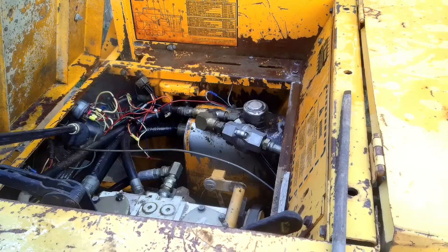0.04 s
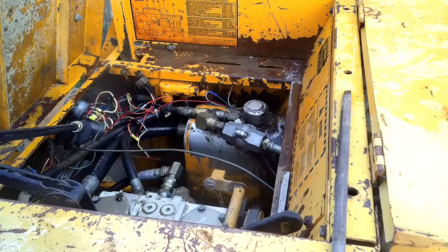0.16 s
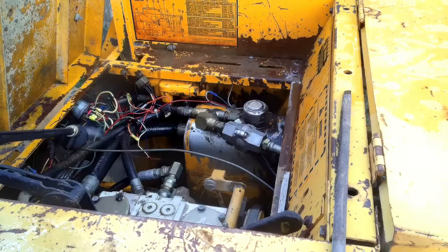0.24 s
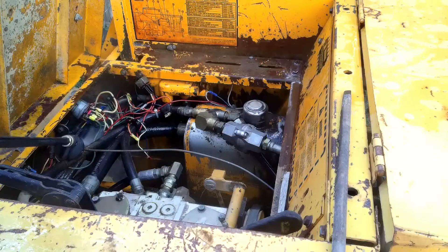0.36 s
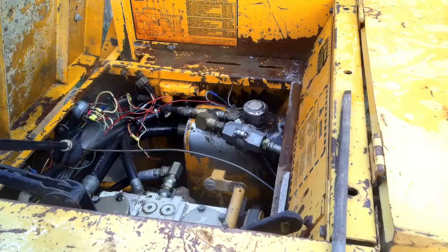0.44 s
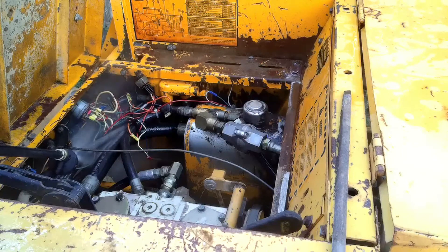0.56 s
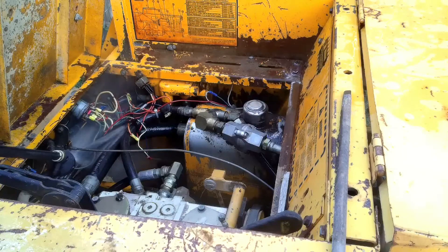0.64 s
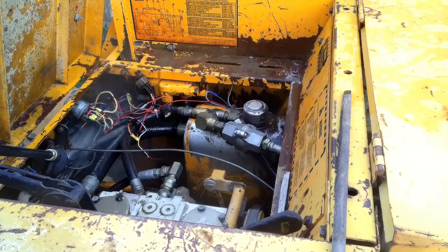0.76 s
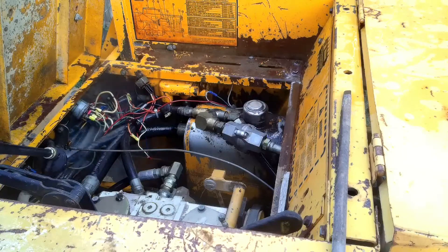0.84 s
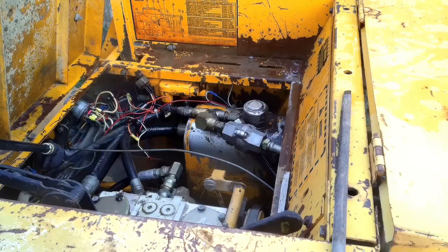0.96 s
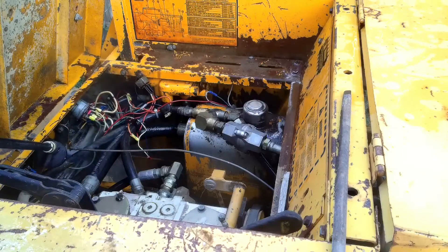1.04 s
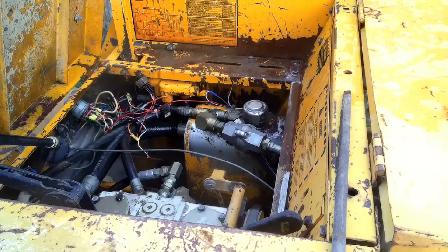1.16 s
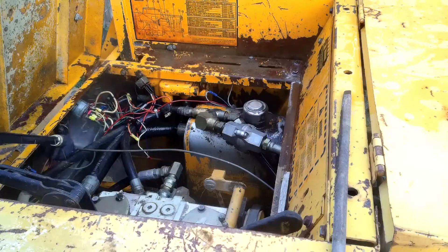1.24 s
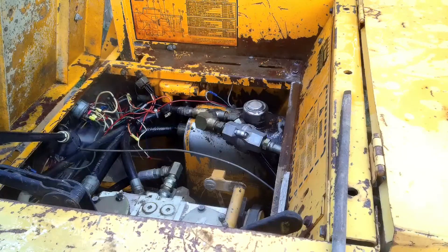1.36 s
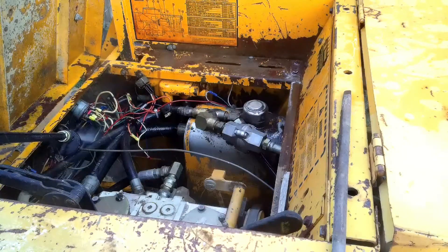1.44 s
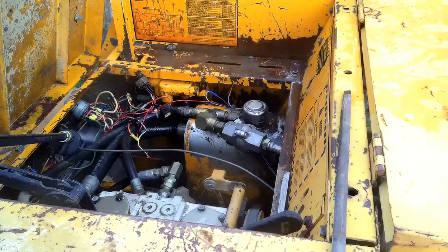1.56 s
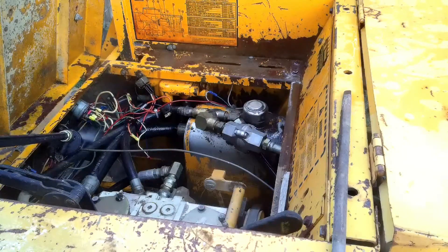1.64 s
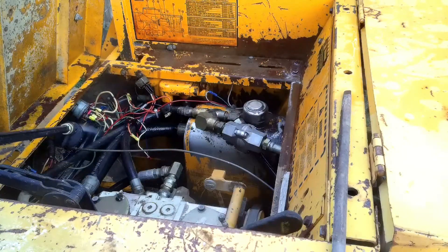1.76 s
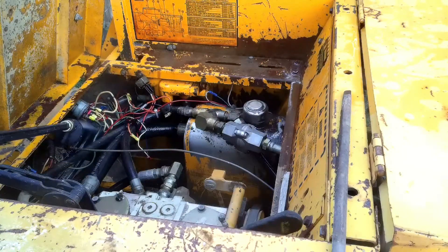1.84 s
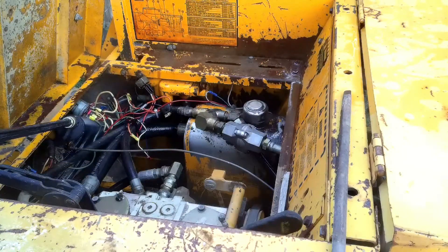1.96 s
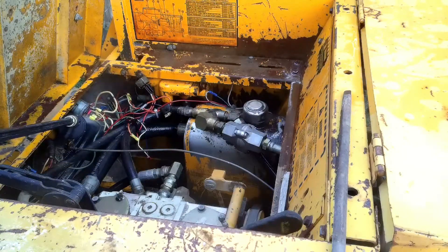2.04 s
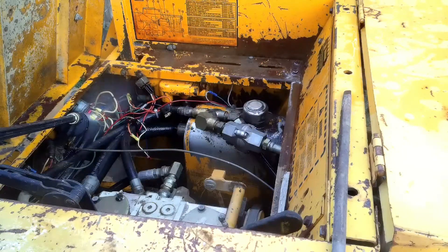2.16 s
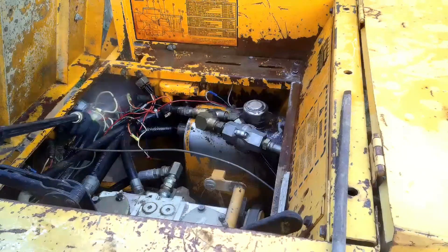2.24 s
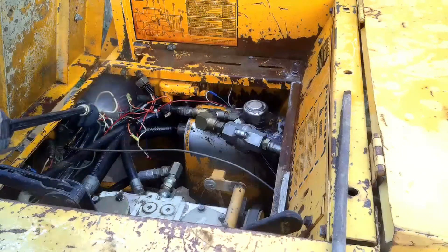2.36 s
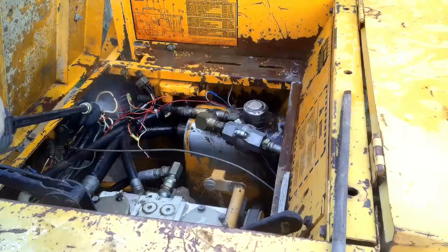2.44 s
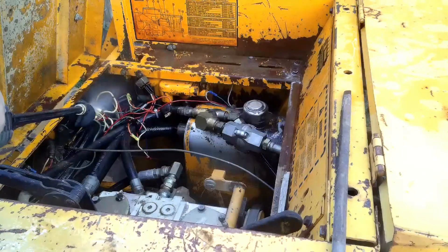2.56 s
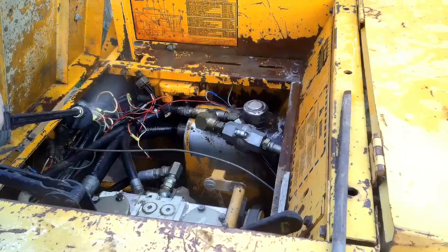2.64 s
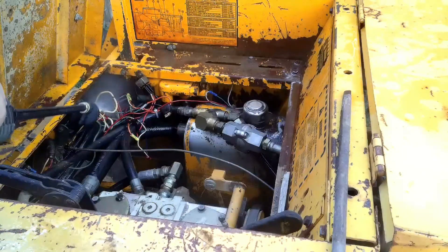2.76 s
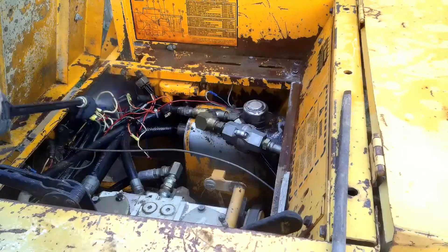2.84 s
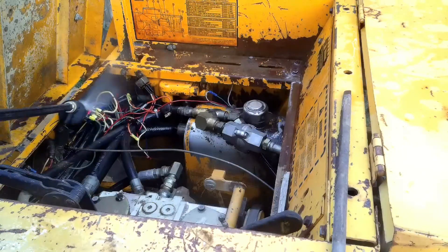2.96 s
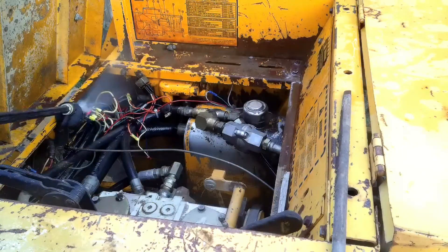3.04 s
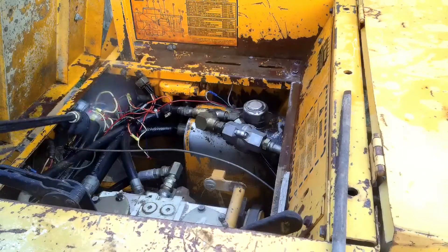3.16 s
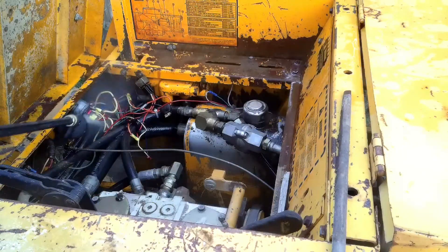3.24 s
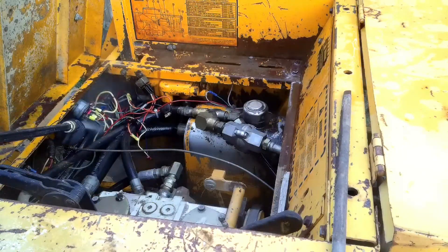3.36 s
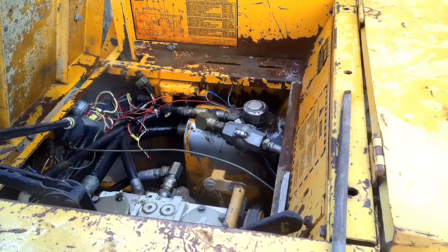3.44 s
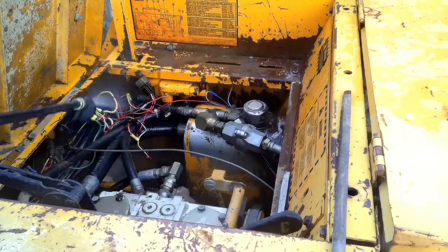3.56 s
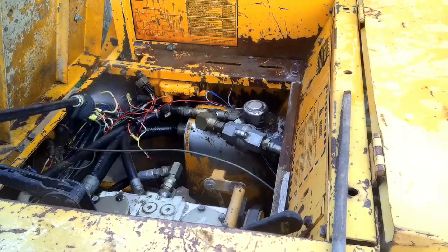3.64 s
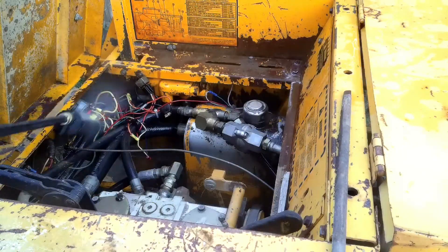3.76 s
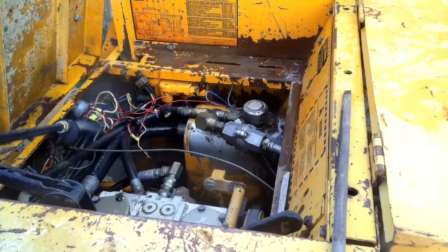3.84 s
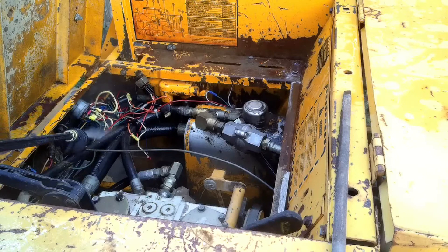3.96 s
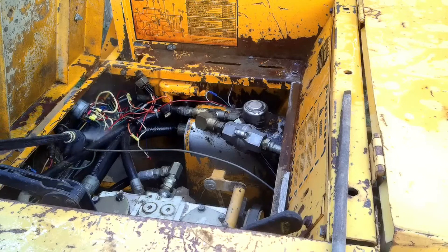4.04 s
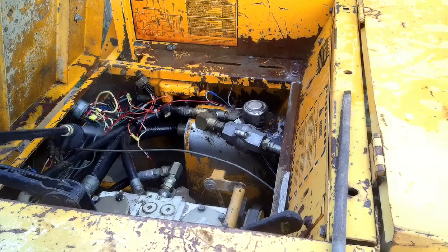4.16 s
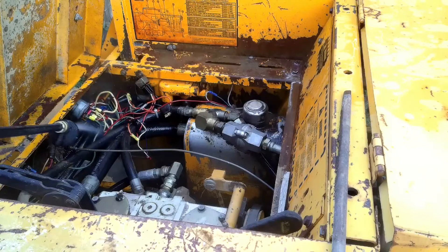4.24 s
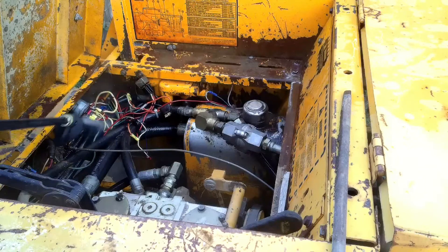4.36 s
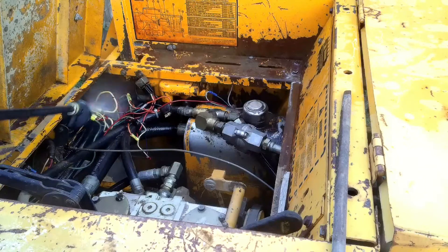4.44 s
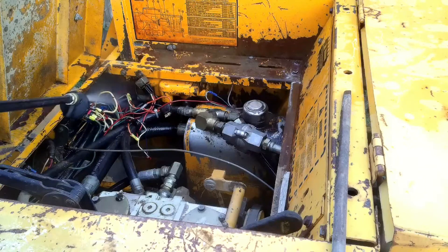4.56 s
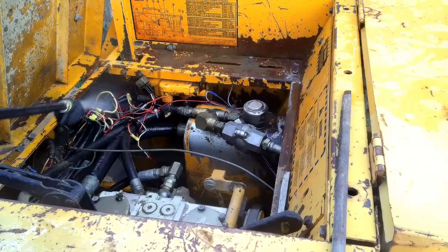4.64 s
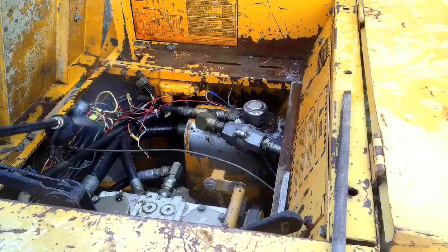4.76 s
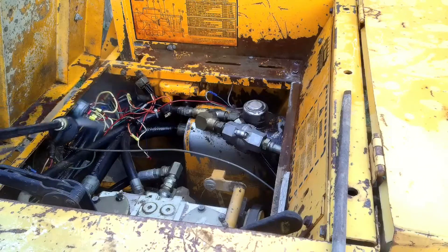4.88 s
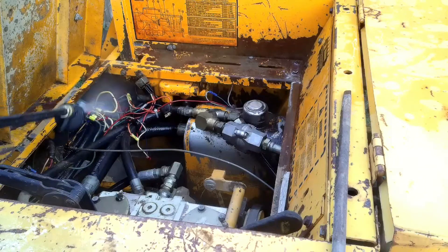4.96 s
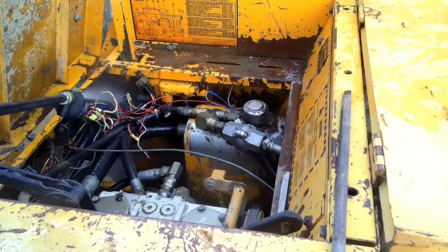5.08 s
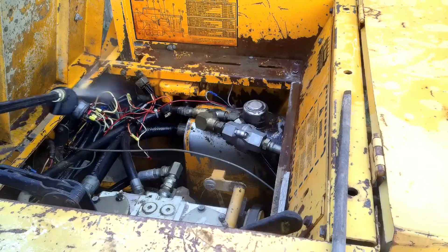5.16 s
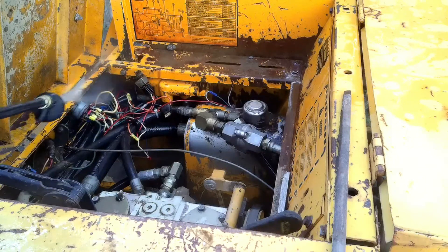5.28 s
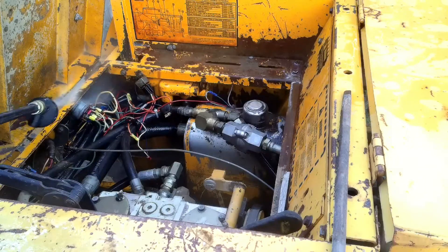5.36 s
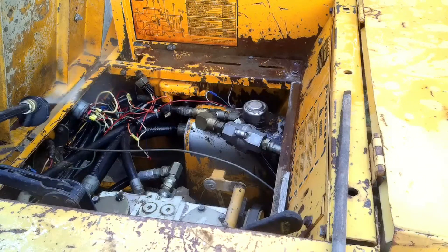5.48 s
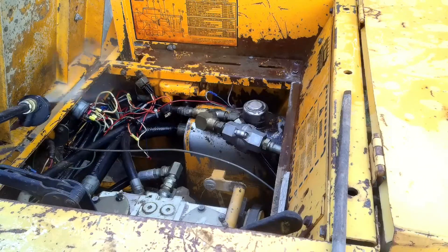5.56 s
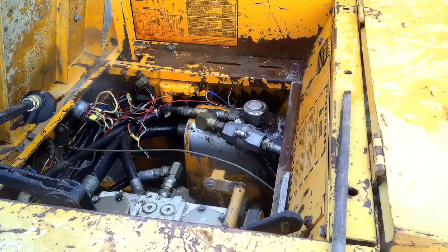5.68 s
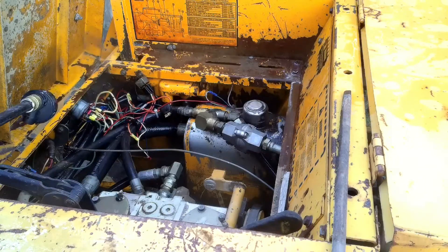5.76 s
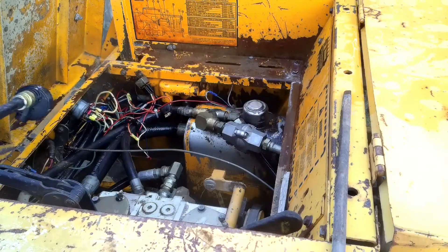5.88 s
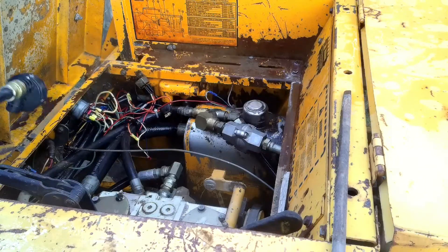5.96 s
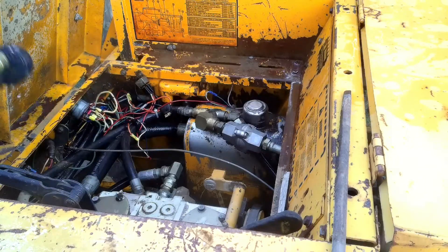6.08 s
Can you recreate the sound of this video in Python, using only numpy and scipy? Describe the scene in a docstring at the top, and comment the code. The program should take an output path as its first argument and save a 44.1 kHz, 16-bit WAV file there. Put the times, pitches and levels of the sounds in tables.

```python
"""A hand-pumped pressure sprayer mists the open engine bay of a machine, outdoors, close to a mono microphone.
Coloured noise and random impacts make its hiss, drumming drops and sheet-metal patter, echoed by the bay.
Sine tones whistle thinly at the nozzle, and a pulse repeated evenly through resonances makes the wand buzz.
When the trigger is let go the pressure dies in a falling, resonant squirt, and the valve shuts with light
clicks of noise; the last drops land over faint yard air."""
import sys
import numpy as np
from scipy import signal
from scipy.fft import rfft, irfft, next_fast_len
from scipy.io import wavfile

SR = 44100
rng = np.random.default_rng(int(sys.argv[2]) if len(sys.argv) > 2 else 0)


def store_wav(level_fs):
    """Save 16-bit WAV to argv[1]."""
    pcm = np.round(np.clip(np.atleast_2d(level_fs), -1, 1) * 32767)
    wavfile.write(sys.argv[1], SR, pcm.T.astype(np.int16))


N = 269615
TIME = np.arange(N) / SR  # seconds
BINS = np.fft.rfftfreq(2 * next_fast_len(N // 2 + 1, True), 1 / SR)  # Hz

# the trigger is let go and the flow collapses; then the valve seats
RELEASE_S, COLLAPSE_S = 5.609, 0.057
SEAT_S, SEATING_S, SEAT_DB = 5.797, 0.04, -21
FLUTTER_HZ = 39.385  # the even pulsing of the flow
SPUTTER_DB = 2  # typical swing of the spits after release


def undb(db):
    """Decibels to gain."""
    return 10 ** (np.asarray(db) / 20)


def curves(rows):
    """Each column of a table, joined by straight lines in time."""
    s, *columns = np.transpose(rows)
    return [np.interp(TIME, s, column) for column in columns]


def colour(points):
    """Gain at every frequency from (Hz, dB) points."""
    hz, db = np.transpose(points)
    return undb(np.interp(np.log(BINS + 1), np.log(hz), db))


def shape(x, gain):
    """Filter by a gain at every frequency."""
    spectrum = rfft(x, 2 * len(BINS) - 2)
    return irfft(spectrum * gain)[:N]


def unit(x, lo=0, hi=SR / 2):
    """Scale to rms 1 within a band in Hz."""
    return x / np.std(shape(x, (BINS >= lo) & (BINS <= hi)))


def walk(rate):
    """Smooth chance with spread 1, changing about rate times a second."""
    return unit(shape(rng.standard_normal(N), 1 / (1 + (BINS / rate) ** 4)))


def since(s):
    """Seconds gone by after a moment, 0 before it."""
    return np.maximum(TIME - s, 0)


def ramp(s, length_s):
    """Rises from 0 to 1, starting at a moment."""
    return np.minimum(since(s) / length_s, 1)


def hump(s, half_length_s):
    """Swells to 1 around a moment and dies away."""
    return np.exp(-2 * ((TIME - s) / half_length_s) ** 2)


def resonance(hz, centre, width):
    """Complex response of one resonance, 1 at its centre."""
    return 1 / (1 + 2j * (hz - centre) / width)


def droplets(per_s, scatter_db, haze):
    """Countless tiny impacts of uneven size in a haze of air noise."""
    landed = rng.random(N) < per_s / SR
    size = undb(scatter_db * np.minimum(rng.exponential(size=N), 5))
    hits = landed * rng.standard_normal(N) * size
    return unit(hits) + haze * rng.standard_normal(N)


# Open air around the machine. Each row: frequency in Hz, relative level in dB per Hz.
YARD_COLOUR = [(30, -14.5), (60, -7), (85, 0.5), (130, -7.5), (200, -16.5), (500, -16), (1200, -25),
               (3300, -31), (6000, -29.5), (15000, -36)]
YARD_DB = -85


def yard():
    """Faint outdoor air: coloured noise whose level wavers gently."""
    air = unit(shape(rng.standard_normal(N), colour(YARD_COLOUR)))
    return air * undb(YARD_DB + 0.74 * walk(7.2))


def bay(x, wet_db, t60_s):
    """The steel walls of the bay throw back a short, dense echo: noise that decays exponentially."""
    echo = rng.standard_normal(N) * undb(-60 * TIME / t60_s) * (TIME > 0.002)
    echo = echo / np.linalg.norm(echo)
    return x + undb(wet_db) * signal.fftconvolve(x, echo)[:N]


# Thin side panel under the drops. Each row: frequency in Hz, relative level in dB per Hz.
PANEL_COLOUR = [(40, -37), (110, -15.5), (160, -17.5), (230, -3.5), (330, -8.5), (560, -0.5), (900, -19),
                (3000, -50)]
# the fan of spray swings onto the panel and patters ever harder until the flow collapses
PANEL_S, PANEL_ATTACK_S, PANEL_DB, PANEL_RISE_DB_PER_S = 4.87, 0.1, -67, 10.5


def panel():
    """Drops on thin sheet metal make a soft low patter."""
    level = undb(PANEL_DB + PANEL_RISE_DB_PER_S * since(PANEL_S))
    envelope = ramp(PANEL_S, PANEL_ATTACK_S) * level * (1 - ramp(RELEASE_S, COLLAPSE_S))
    return unit(shape(droplets(620, 1.2, 0.96), colour(PANEL_COLOUR))) * envelope


# Drops landing after the valve has shut. Each row: frequency in Hz, relative level in dB per Hz.
LAST_DROPS_COLOUR = [(200, -6), (550, 8), (900, 1), (1650, 0), (2300, -4), (3800, -3), (6000, -9),
                     (15000, -21)]
LAST_DROPS_DB, LAST_DROPS_FALL_DB_PER_S = -77, -57


def last_drops():
    """Mist still in the air settles on the metal as fading, coloured impacts."""
    level = undb(LAST_DROPS_DB + LAST_DROPS_FALL_DB_PER_S * since(SEAT_S))
    envelope = ramp(SEAT_S, SEATING_S / 2) * level
    return unit(shape(droplets(2500, 1.4, 1.1), colour(LAST_DROPS_COLOUR))) * envelope


# The valve shutting. Each row: start in seconds, level in dB before the decay, ring (decay time) in seconds,
# treble tilt in dB (approached far above 5 kHz, then scaled out of the overall level).
VALVE_CLICKS = [(5.8129, -54, 0.0026, -6), (5.819, -63, 0.0079, 12), (5.8285, -62, .0015, -15)]
# Shared colour of the clicks. Each row: frequency in Hz, relative level in dB per Hz.
CLICK_COLOUR = [(300, -9), (1000, -23), (1700, 3), (3200, -9), (6000, -15), (10000, -25), (15000, -37)]


def valve():
    """Short plastic ticks as the valve seats: noise that starts at once and decays exponentially."""
    out = 0
    for s, db, ring_s, treble_db in VALVE_CLICKS:
        tilt = undb(treble_db * BINS / (BINS + 5000))
        tick = unit(shape(rng.standard_normal(N), colour(CLICK_COLOUR) * tilt))
        out = out + tick * undb(db) * (TIME >= s) * np.exp(-np.abs(TIME - s) / ring_s)
    return out


# Squeaks as the trigger eases. Each row: middle in seconds, pitch there in Hz, half-length in seconds,
# peak level in dB.
CHIRPS = [(5.547, 2170, .024, -52), (5.571, 2900, .012, -50), (5.585, 1300, .04, -54),
          (5.607, 4400, .012, -49)]
CHIRP_GLIDE_S = 0.25  # time in which the pitch falls by a factor e


def chirps():
    """The nozzle squeaks briefly, each squeak a sine sliding down."""
    out, waver = 0, 1 + 0.01 * walk(200)
    for s, hz, half_length_s, db in CHIRPS:
        glide = np.exp(-np.clip((TIME - s) / CHIRP_GLIDE_S, -1, 1))
        turn = 2 * np.pi * np.cumsum(hz * glide * waver) / SR
        out = out + np.sqrt(2) * np.sin(turn) * undb(db) * hump(s, half_length_s)
    return out


# The jet grazing a nearby edge. Each row: middle in seconds, half-length in seconds, peak level in dB.
SIZZLES = [(.47, .07, -53), (1.11, 0.07, -53), (2.13, 0.18, -55), (2.6, .4, -59), (3.16, 0.23, -59)]
# Colour of the grazing jet. Each row: frequency in Hz, relative level in dB per Hz.
SIZZLE_COLOUR = [(2000, -22), (6000, -6), (8000, -3), (10800, 2.5), (12500, -6), (15500, -11)]


def sizzles():
    """Bright, grainy flares of tiny impacts where the jet grazes an edge."""
    envelope = sum(undb(db) * hump(s, half_length_s) for s, half_length_s, db in SIZZLES)
    return unit(shape(droplets(5000, 1.5, 0.6), colour(SIZZLE_COLOUR))) * envelope


# Partials of the squirt's note. Each row: multiple of the pitch, level in dB before it flickers.
SQUIRT_PARTIALS = [(1, -4), (2, -2), (3, -7.5), (4, -7), (5, -13), (6, -15)]
# Resonances of the wand that the squirt slides through. Each row: centre in Hz, width in Hz, peak gain in dB.
SQUIRT_BODY = [(600, 170, 0.5), (1130, 170, -3), (1560, 90, 2.5), (1830, 150, 4.5), (2470, 110, 5),
               (2870, 100, 12), (3470, 160, 3), (4050, 160, 0)]
# the last squirt swells quickly, then pitch and level run down with the pressure
SQUIRT_S, SQUIRT_HZ, SQUIRT_DB = 5.583, 2507, -41.5
SQUIRT_ATTACK_S, SQUIRT_GLIDE_S, SQUIRT_FALL_DB_PER_S = 0.02, 0.1325, -93
SQUIRT_END_S, SQUIRT_FADE_S = 5.77, 0.017  # end of the note; its air lasts until the valve seats
SQUIRT_AIR_DB = -4  # air that escapes with the note rings the same resonances


def squirt():
    """As pressure dies, the nozzle sputters a broken, airy note that flares in each resonance it slides through."""
    start_s = SQUIRT_S - SQUIRT_ATTACK_S
    hz = SQUIRT_HZ * np.exp((SQUIRT_ATTACK_S - since(start_s)) / SQUIRT_GLIDE_S)
    level = undb(SQUIRT_DB + SQUIRT_FALL_DB_PER_S * since(SQUIRT_S))
    envelope = ramp(start_s, SQUIRT_ATTACK_S) * level
    turn = 2 * np.pi * np.cumsum(hz * (1 + 0.016 * walk(350) + 0.01 * walk(60))) / SR
    note = 0
    for multiple, db in SQUIRT_PARTIALS:
        flicker_db = 2.2 * walk(170) + 2.6 * walk(55)
        note = note + undb(db + flicker_db) * np.sin(round(multiple) * turn)
    note = note * (1 - ramp(SQUIRT_END_S, SQUIRT_FADE_S))
    air = undb(SQUIRT_AIR_DB + SPUTTER_DB * walk(60)) * rng.standard_normal(N)
    air = air * (1 - ramp(SEAT_S, SEATING_S))
    power = 0
    for centre, width, peak_db in SQUIRT_BODY:
        power = power + np.abs(undb(peak_db) * resonance(BINS, centre, width)) ** 2
    return shape((note + air) * envelope, np.sqrt(power))


# Resonances of the wand rung by the flutter. Each row: centre in Hz, width in Hz (a second pole is four times
# as wide), level in dB relative to the mist's flow level, dB gained at full lift.
WAND = [(118.5, 20, -48, 4.5), (263, 18.2, -24, 1), (425, 49, -34.5, 0.5), (550, 54, -27.5, 2.5),
        (659, 28, -22, -7), (922, 39, -8.5, -0.5), (1023, 5.1, -11.5, -4), (1280, 102, -18, 2),
        (1660, 174, -25.5, -2), (2257, 38, -14, 13), (2650, 300, -20.5, 2.5), (3432, 22, -7.5, -2),
        (3506, 18, -10.5, -3), (4465, 110, -5.5, -4), (4570, 26, -14.5, -1), (6820, 200, -22.5, 5.5),
        (8760, 260, -30, 10.5)]


def flutter(lift):
    """The flow pulses evenly; the wand's resonances pick out clusters of its harmonics, which makes a fine buzz."""
    cycle = np.cumsum(FLUTTER_HZ * (1 + 0.0002 * walk(3) + 0.0008 * walk(40))) / SR
    size = 2 ** 14  # samples in the table of one cycle
    place = (cycle % 1 * size).astype(int)
    harmonics = np.arange(size // 2 + 1) * FLUTTER_HZ
    # one noisy gush, the same in every cycle
    gush = np.exp(2j * np.pi * rng.random(len(harmonics)))
    out = 0
    for hz, width, db, lift_db in WAND:
        response = resonance(harmonics, hz, width) * resonance(harmonics, hz, 4 * width)
        ring = irfft(gush * np.abs(response)) * size / np.sqrt(2)
        out = out + ring[place] * undb(db + lift_db * lift + 0.5 * walk(3.6))
    return out


def tone(hz, waver_hz, flicker_db):
    """A flow tone of about rms 1, unsteady in pitch and strength."""
    turn = 2 * np.pi * np.cumsum(hz + waver_hz * walk(58.7)) / SR
    return np.sqrt(2) * np.sin(turn) * undb(flicker_db * walk(39))


# The main whistle swelling and fading. Each row: time in seconds, level in dB.
WHISTLE_LEVEL = [(0, -42), (.55, -46.5), (1.3, -47), (1.65, -44), (2.15, -45), (2.6, -40.5), (3, -43),
                 (3.25, -47), (3.7, -51), (4.15, -48), (4.4, -57.5), (4.8, -54), (4.95, -53.5), (5.2, -52),
                 (5.35, -59), (5.53, -51), (5.59, -45)]
# Weaker edge tones of the nozzle. Each row: pitch in Hz, level in dB relative to the mist's flow level,
# dB gained at full lift.
EDGE_TONES = [(1704, -12.5, 1), (2448, -8.5, 6), (2538, -17, 4), (3407, -11.5, 2), (4247, -9, -4),
              (5112, -14.5, -4), (7181, -23, -2), (7262, -23, -2), (8899, -24, 0)]
WHISTLE_HZ, WHISTLE_SAG_HZ_PER_S = 3654, -1  # sinks a little with the tank's pressure
BEND_S, BEND_GLIDE_S = 5.603, 0.15  # the whistles bend down as the pressure goes


def whistles(lift, mist_db):
    """Edge tones at the nozzle: one strong, the others shifting as the wand swings; all bend down at release."""
    db, = curves(WHISTLE_LEVEL)
    bend = np.exp(-since(BEND_S) / BEND_GLIDE_S)
    main_hz = (WHISTLE_HZ + WHISTLE_SAG_HZ_PER_S * TIME) * bend
    out = tone(main_hz, waver_hz=4.33, flicker_db=0.9) * undb(db)
    for edge_hz, rel_db, lift_db in EDGE_TONES:
        edge = tone(edge_hz * bend, waver_hz=5, flicker_db=1.7)
        out = out + edge * undb(mist_db + rel_db + lift_db * lift)
    return out


def flow_db(lift, db, drift_db_per_s, lift_db, collapse_db, drain_db_per_s):
    """Level of one share of the spray: drifts, follows the wand, steps and drains at release, drops at the seat."""
    steady_db = db + drift_db_per_s * TIME + lift_db * lift
    release_db = collapse_db * ramp(RELEASE_S, COLLAPSE_S) + drain_db_per_s * since(RELEASE_S)
    return steady_db + release_db + SEAT_DB * ramp(SEAT_S, SEATING_S)


# Colour of the whole spray, close to the microphone. Each row: frequency in Hz, relative level in dB per Hz.
SPRAY_COLOUR = [(30, -46), (200, -30.5), (450, -19.5), (850, -13.5), (1280, -3), (1800, -5), (2650, -1),
                (3800, -3.5), (4350, -1), (4850, -7), (6100, -5.5), (7800, -17), (8900, -12), (12500, -23),
                (15600, -29)]


def spray(drum_db, splash_db, mist_db):
    """Heavy drops drum, finer ones splash, the mist hisses; each share wavers as the fan crosses the parts."""
    hiss = colour(SPRAY_COLOUR)
    # shares of the power
    low = 1 / (1 + (BINS / 900) ** 6)
    high = 1 - 1 / (1 + (BINS / 3400) ** 6)
    drum = shape(droplets(3000, 1.74, 0.99), hiss * np.sqrt(low))
    splash = shape(droplets(10000, 1.2, 1.2), hiss * np.sqrt((1 - low) * (1 - high)))
    mist = shape(droplets(18000, 1.0, 1.2), hiss * np.sqrt(high))
    # each level holds within the share's own band
    drum = unit(drum, 300, 850) * undb(drum_db + 1.3 * walk(5.6))
    splash = unit(splash, 1100, 2100) * undb(splash_db + 0.76 * walk(45))
    mist = unit(mist, 4800, 12000) * undb(mist_db + 0.9 + 0.5 * walk(17))
    return drum + splash + mist


# Swell of the hiss around the whistle's pitch. Each row: time in seconds, gain in dB at the band's centre.
RUSH = [(0, 0), (1.4, 0.5), (2.3, 1), (2.6, 1.5), (3.1, 1.5), (3.4, -0.2), (4.2, -0.5), (4.5, -2.5),
        (5.05, -1), (5.3, -1.5), (5.5, -1.5), (5.6, .7)]
RUSH_HZ, RUSH_WIDTH_HZ = 3970, 2400
FINE_HZ, FINE_FALL_DB_PER_S = 7200, -45  # the finest mist stops first, and the rest comes in spits
PULSING_DB = 0.55  # the flutter throbs in the hiss
# the hiss glances off the part under the nozzle, whose distance changes as the wand swings
GLANCE_S, GLANCE_SWING_S, GLANCE_DB = 0.001094, 0.00014, -21


def jet(x, lift):
    """The jet throbs, swells in its middle band, glances off the parts, and on release sputters and dulls."""
    rush_db, = curves(RUSH)
    middle = shape(x, np.exp(-(2 * (BINS - RUSH_HZ) / RUSH_WIDTH_HZ) ** 2))
    x = x + middle * (undb(rush_db) - 1)
    fine = shape(x, 1 - 1 / (1 + (BINS / FINE_HZ) ** 8))
    x = x + fine * (undb(FINE_FALL_DB_PER_S * since(RELEASE_S)) - 1)
    throb_db = PULSING_DB * np.sin(2 * np.pi * FLUTTER_HZ * TIME)
    spit_db = SPUTTER_DB * ramp(RELEASE_S, COLLAPSE_S) * walk(70)
    x = x * undb(throb_db + spit_db)
    lag_s = GLANCE_S + GLANCE_SWING_S * (lift + 0.5 * walk(1.5))
    return x + undb(GLANCE_DB) * np.interp(TIME - lag_s, TIME, x)


# How far the wand is swung up. Each row: time in seconds, lift from 0 to 1.
LIFT = [(0, 0.5), (.8, 0), (1.4, 0.15), (1.7, 0.6), (2.9, 0.3), (3.3, 0.7), (3.8, 0.97), (4.5, 0.57),
        (4.9, 0.99), (5.6, 0.83)]
# Flow of each share of the spray. Each holds: level in dB, drift as the tank empties in dB/s, dB gained at
# full lift, step as the flow collapses in dB, fall as the wand drains in dB/s. The mist plays 0.9 dB above its own.
DRUM_FLOW = (-61, 0.18, -1, -11, -27)
SPLASH_FLOW = (-52, -0.05, -0.5, -2, -68)
MIST_FLOW = (-48.5, -0.1168, -0.5, 0, -135)
# the flutter dies away as the trigger eases; the whistles hold until just before the flow collapses
EASE_S, EASING_S = 4.84, 1
UNSTEADY_S, UNSTEADY_FADE_S = 5.59, 0.057


def scene():
    """All of the sprayer's sounds reach one microphone, written alike to both channels."""
    lift, = curves(LIFT)
    drum_db = flow_db(lift, *DRUM_FLOW)
    splash_db = flow_db(lift, *SPLASH_FLOW)
    mist_db = flow_db(lift, *MIST_FLOW)
    # flutter and whistles need full pressure
    steady = 1 - ramp(UNSTEADY_S, UNSTEADY_FADE_S)
    buzz = flutter(lift) * undb(mist_db) * (1 - ramp(EASE_S, EASING_S))
    hiss = jet(spray(drum_db, splash_db, mist_db), lift) + sizzles()
    near = hiss + panel() + chirps() + squirt() + valve() + last_drops()
    wet = bay(near, wet_db=-14, t60_s=0.16)
    mono = wet + steady * (buzz + whistles(lift, mist_db)) + yard()
    return np.array([mono, mono])


TOP_HZ = 15720


def record(dry):
    """The recorder cuts the top steeply, with a 12th-order elliptic low-pass."""
    low_pass = signal.ellip(12, 0.1, 90, TOP_HZ, fs=SR, output="sos")
    return signal.sosfilt(low_pass, dry)


dry = scene()
out = record(dry)
store_wav(out)
```